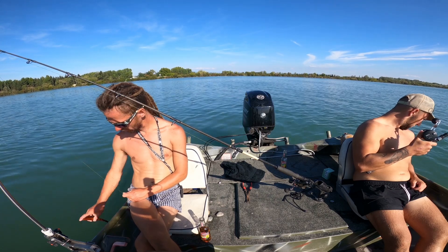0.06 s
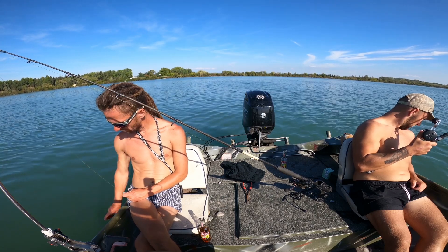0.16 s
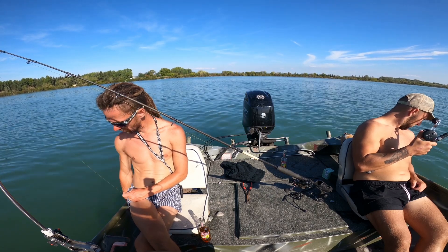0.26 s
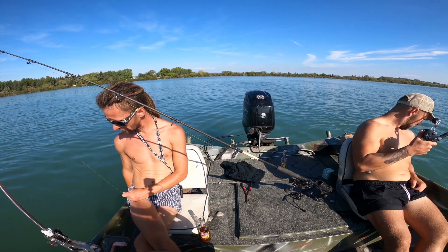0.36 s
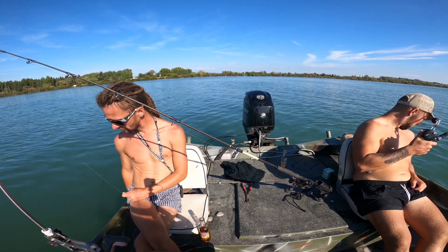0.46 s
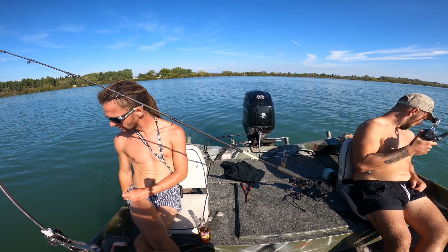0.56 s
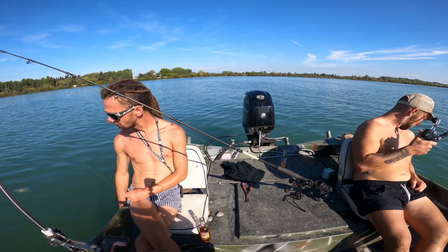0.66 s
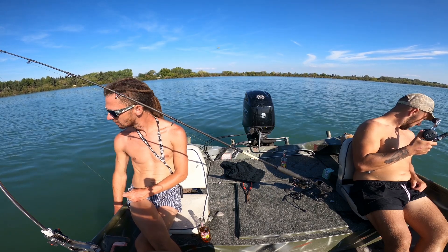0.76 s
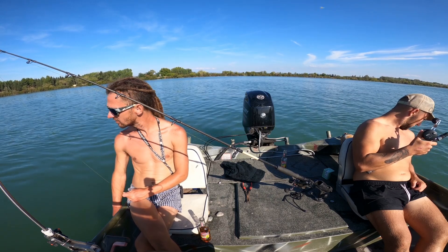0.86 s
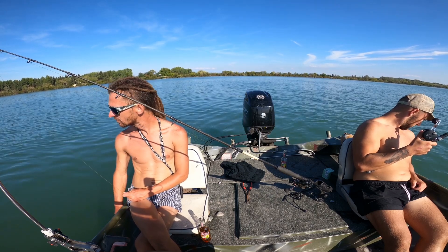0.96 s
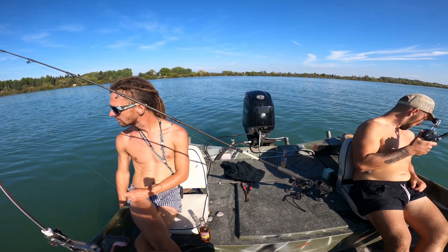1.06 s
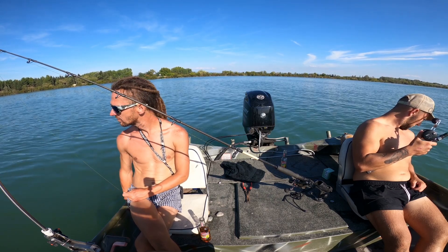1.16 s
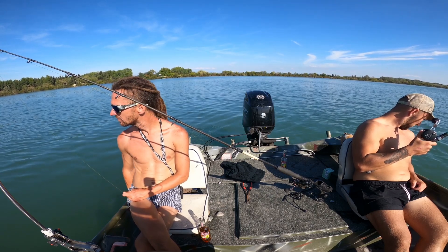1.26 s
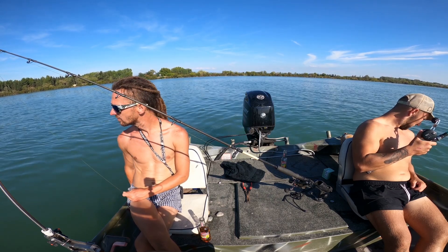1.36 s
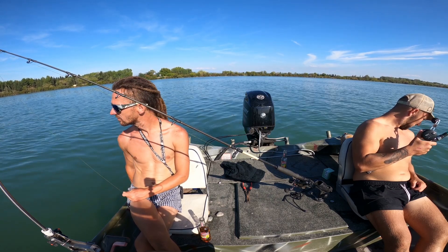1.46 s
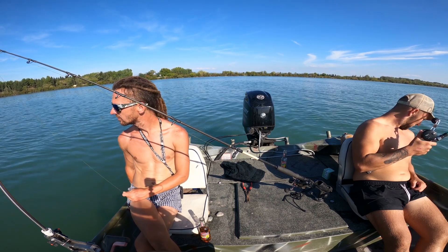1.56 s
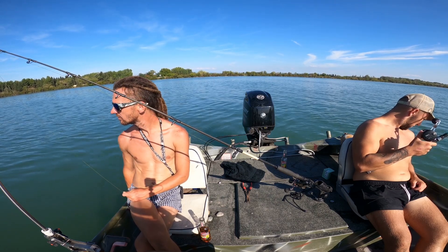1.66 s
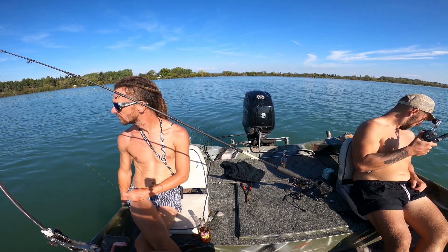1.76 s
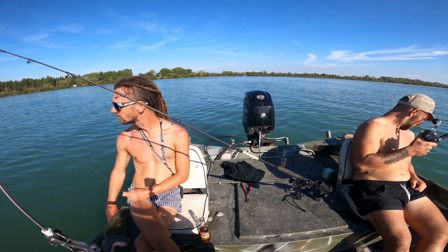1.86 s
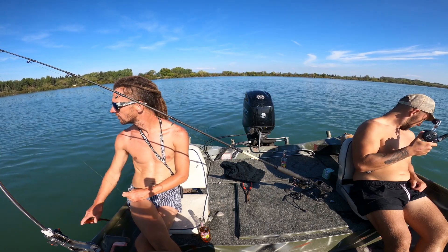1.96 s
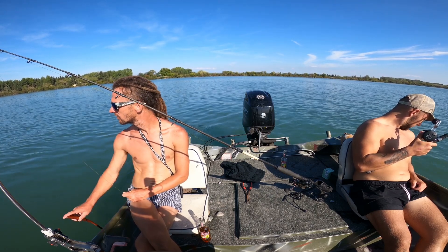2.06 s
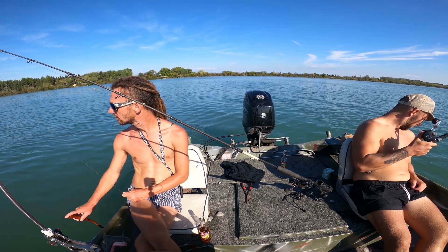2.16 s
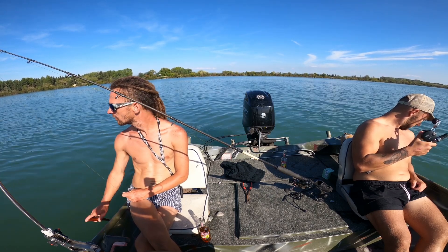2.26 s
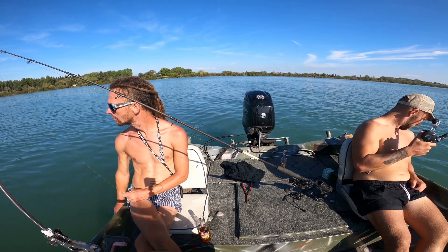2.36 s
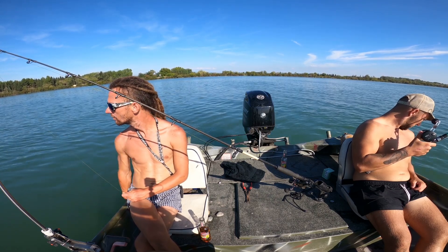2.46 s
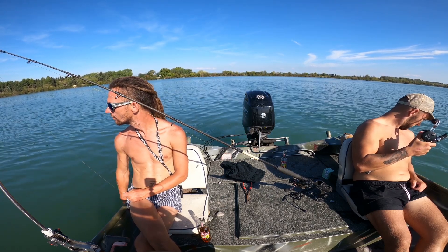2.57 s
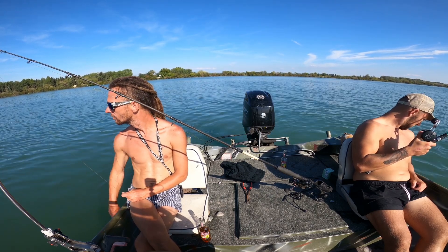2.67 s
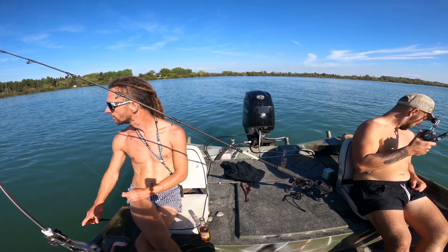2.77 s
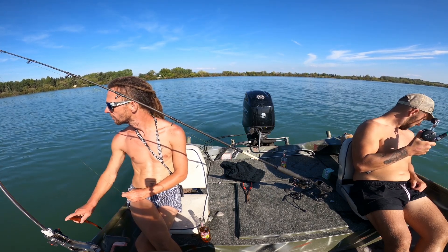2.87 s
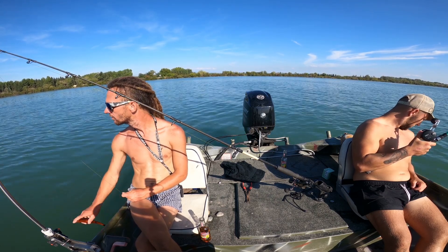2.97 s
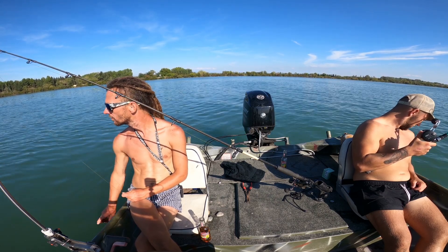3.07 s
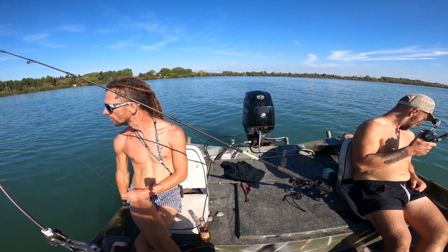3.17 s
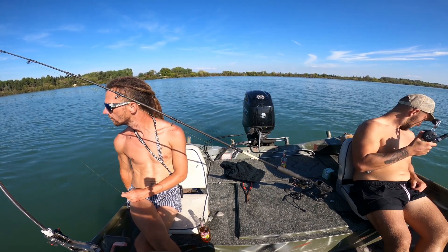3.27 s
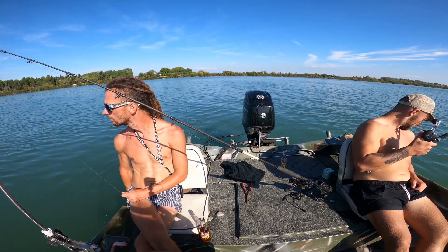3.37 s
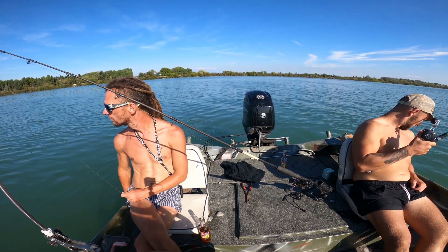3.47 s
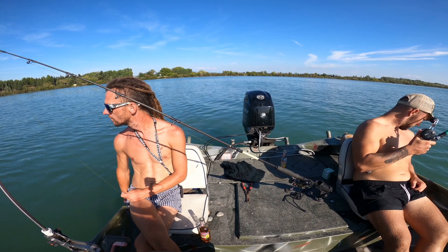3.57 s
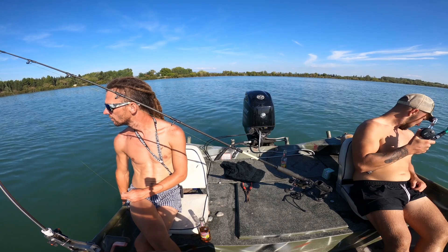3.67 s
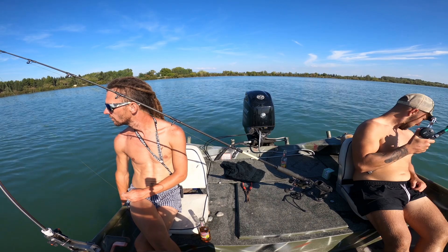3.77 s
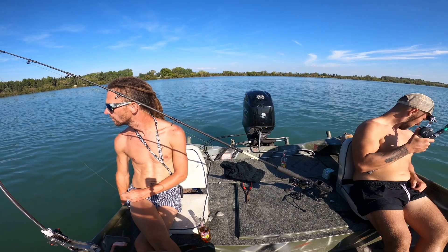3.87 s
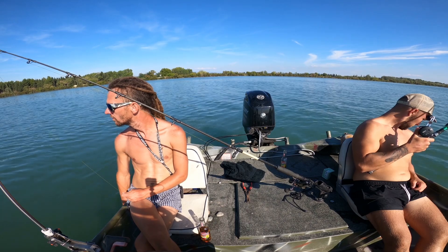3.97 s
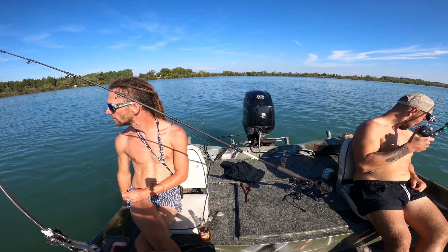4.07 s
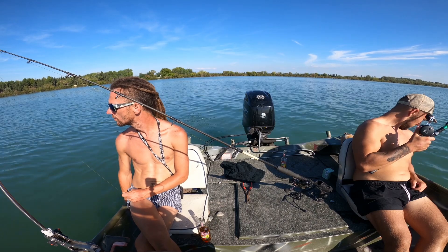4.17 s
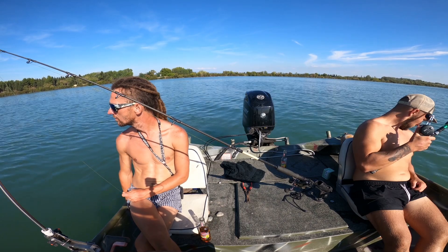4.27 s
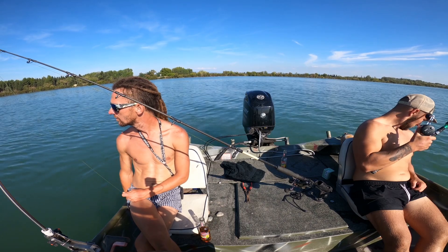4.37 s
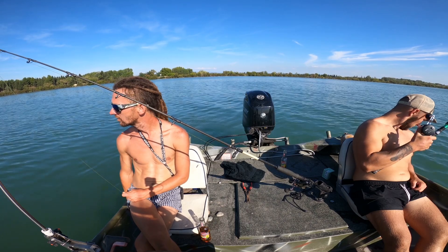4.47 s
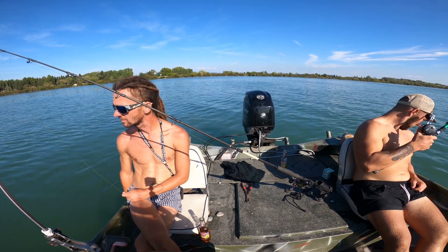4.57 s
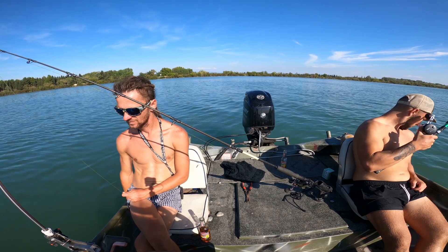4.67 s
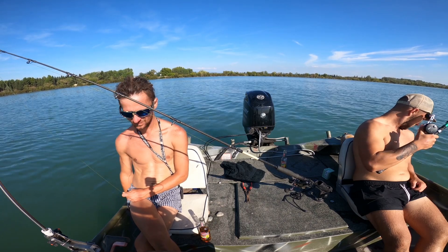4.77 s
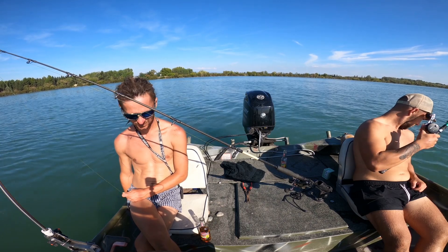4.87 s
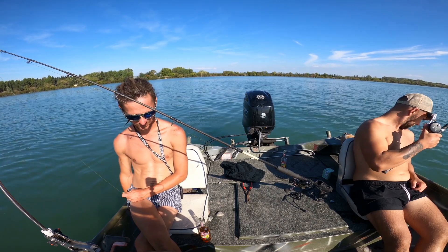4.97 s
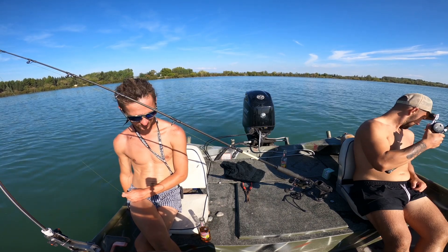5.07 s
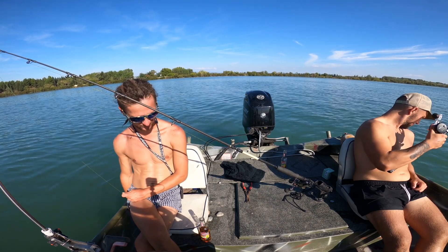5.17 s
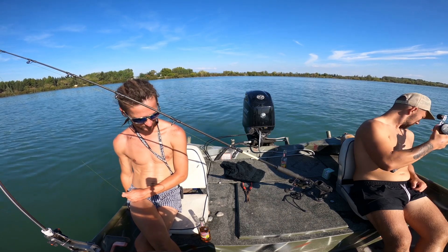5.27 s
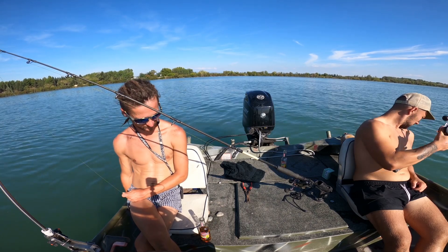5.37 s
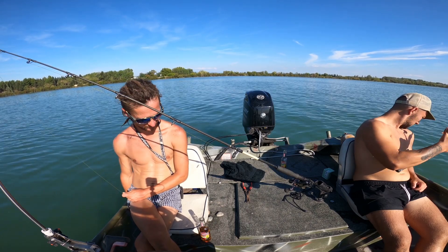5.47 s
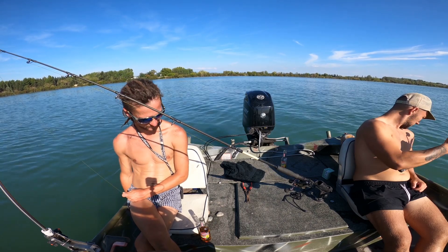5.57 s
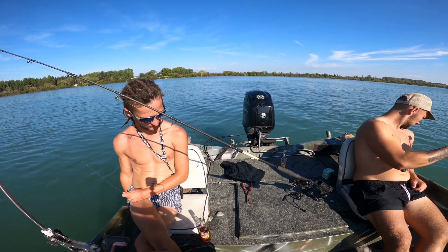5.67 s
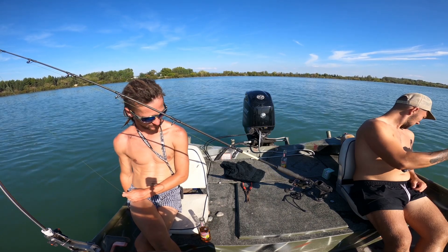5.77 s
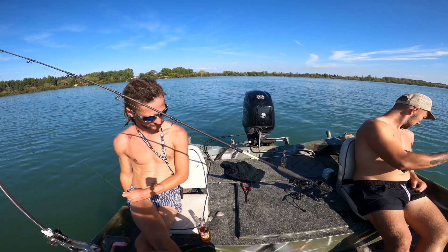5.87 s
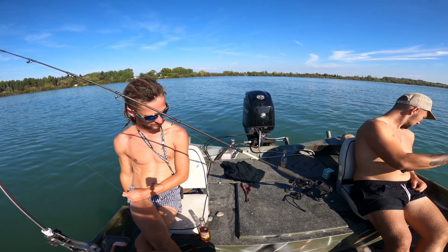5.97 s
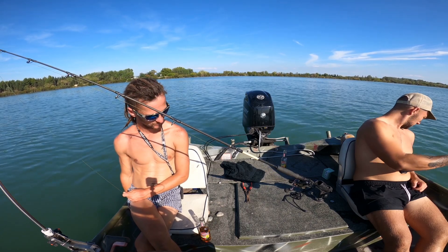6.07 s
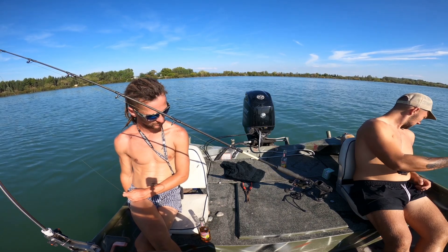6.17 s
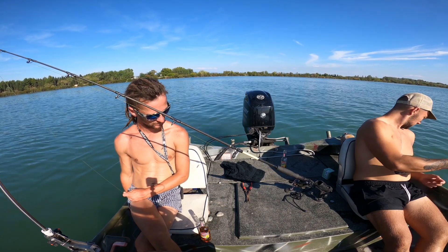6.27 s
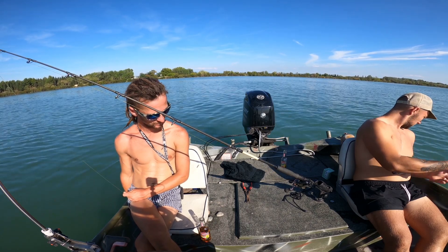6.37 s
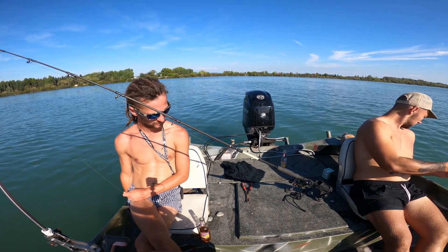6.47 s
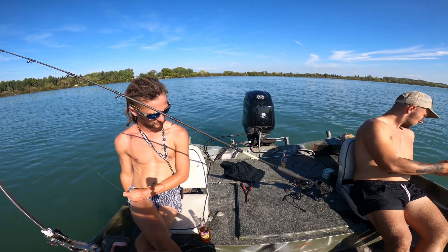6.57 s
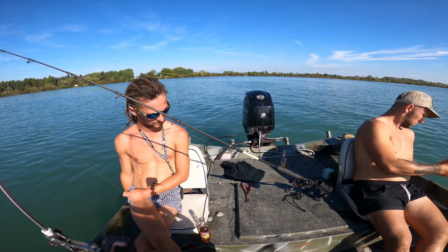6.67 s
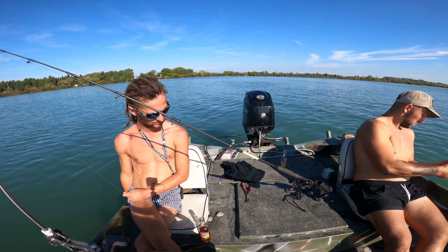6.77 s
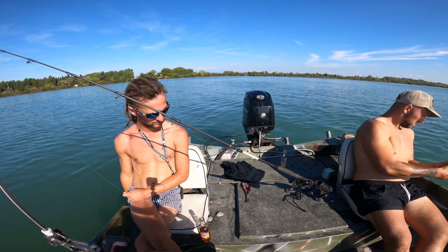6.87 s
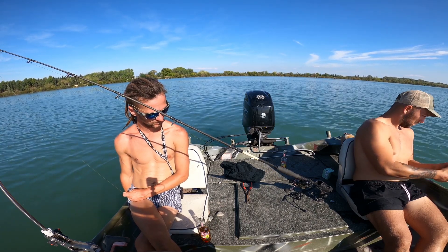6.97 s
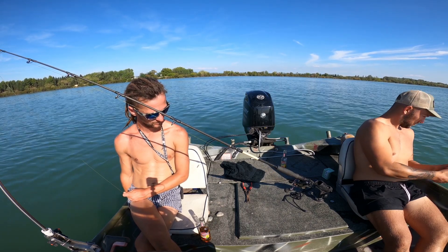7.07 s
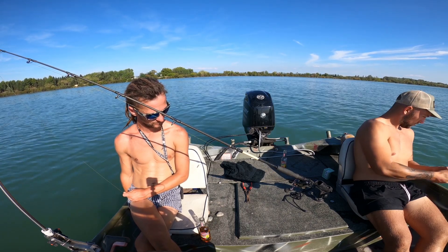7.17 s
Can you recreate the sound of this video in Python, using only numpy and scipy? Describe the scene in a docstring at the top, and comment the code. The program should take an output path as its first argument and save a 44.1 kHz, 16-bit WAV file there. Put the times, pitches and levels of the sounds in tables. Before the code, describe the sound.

Close stereo pickup outdoors, no room echo. A low, almost pure hum and faint wind run throughout. Early on comes a crisp water slap with a hollow, quickly rising plop, then fizzing droplets. About two seconds later two similar strokes land, slightly left, under a second apart. Afterwards there is only hum, wind and scattered dry knocks on the boat.

```python
"""A wooden fishing call is swung into a calm river three times from a small boat. Each stroke slaps the surface
(shaped noise) and opens an air cavity, a tone that jumps at pinch-off and glides up as the pocket shrinks.
Spray falls back as dense tiny bubbles over fizz; some bubbles ring alone as rising, decaying sines.
A low machine hum wavers in the hull, light wind rumbles as filtered noise, and tackle knocks on deck in
short resonant bursts."""
import sys
import numpy as np
from scipy import signal
from scipy.fft import rfft, irfft, next_fast_len
from scipy.io import wavfile
from scipy.ndimage import uniform_filter1d, map_coordinates

SR = 44100
rng = np.random.default_rng(int(sys.argv[2]) if len(sys.argv) > 2 else 0)


def digitize_waveform(pressure):
    """Quantize a signal to 16-bit integers and store it at the path in sys.argv[1].

    Rows of a 2-D input are taken as channels; values are limited to [-1, 1].
    """
    field = np.atleast_2d(pressure).T
    bounded = np.clip(field, -1, 1)
    quanta = np.round(bounded * 32767).astype(np.int16)
    wavfile.write(sys.argv[1], SR, quanta)


N = 317961

# strokes: pinch_off_s, slap_lead_s, slap_db, smack_over_slap_db, slap_tone_hz, tone_lift_db, plop_db,
# open_hz, jump_hz, climb_hz_per_s, climb_time_s, t60_s, life_s
STROKES = [(.3425, .0085, -18.5, -2, 2200, 10, .8, 112, 83, 10000, .036, .093, .066),
           (2.5185, .0085, -19.5, -6, 3400, 2.5, .1, 110, 49, 4220, .9, .106, .046),
           (3.2678, .006, -16.5, -11, 5600, 1.5, -1, 105, 30, 6220, .072, .104, .052)]


def amp(db):
    """Gain of a dB value."""
    return 10 ** (np.asarray(db) / 20)


def unit(x):
    """Scaled to rms 1."""
    return x / np.sqrt(np.mean(x ** 2) + 1e-20)


def along(points, hz):
    """(hz, value) points interpolated on a log frequency axis."""
    f, v = np.transpose(points)
    return np.interp(np.log(hz + 1), np.log(f + 1), v)


def curve(rows):
    """One value per sample from (time_s, value) rows."""
    return np.interp(np.arange(N) / SR, *np.transpose(rows))


def wobble(rate_hz):
    """A smooth random curve, rate_hz knots a second."""
    knots = rng.standard_normal(int(N * rate_hz / SR) + 4)
    return map_coordinates(knots, [np.arange(N) * rate_hz / SR])


def filtered(x, response):
    """x times a complex response of frequency."""
    m = next_fast_len(x.shape[-1] + 8192)
    spectrum = rfft(x, m) * response(np.fft.rfftfreq(m, 1 / SR))
    return irfft(spectrum, m)[..., :x.shape[-1]]


def ringing(f, hz, width_hz):
    """Response of one causal resonance."""
    return 1j * f * width_hz / (hz * hz - f * f + 1j * f * width_hz)


def add(track, start_s, sound):
    """Mixes a sound in at a time."""
    part = track[..., round(start_s * SR):][..., :sound.shape[-1]]
    part += sound[..., :part.shape[-1]]


def near(size):
    """Stereo white noise, nearly alike left and right in the bass, less so in the treble."""
    # hz, differing_share
    apart = [(500, 0.06), (3000, 0.2), (7000, 0.36), (15000, .6)]
    differing = filtered(rng.standard_normal((2, size)), lambda f: along(apart, f))
    return rng.standard_normal(size) + differing


def rush(spectrum, patchy_db):
    """Stereo noise of rms 1 with patches of random gain in time and frequency."""
    # hz, left_right_likeness
    alike = [(22, 0.47), (60, 0.93), (150, 0.99), (380, 0.8), (950, 0.73), (2400, 0.15), (6000, .22)]
    z = signal.stft(rng.standard_normal((2, N)), nperseg=512)[2]
    field = uniform_filter1d(rng.standard_normal(z.shape[1:]), size=8, axis=0)
    field = uniform_filter1d(field, size=16, axis=1)
    pair = signal.istft(z * amp(patchy_db * unit(field)), nperseg=512)[1][:, :N]

    def mid_side(f):
        turn = np.arccos(np.clip(along(alike, f), -1, 1)) / 2
        return amp(along(spectrum, f)) * [np.cos(turn), np.sin(turn)]

    mid, side = filtered(pair, mid_side)
    return unit(np.array([mid + side, mid - side]))


def wind():
    """Lumpy low-passed noise for the wind, and a faint far hiss."""
    # time_s, level_db
    wind_levels = [(0, -36.5), (.2, -49.5), (1.04, -44), (1.4, -47.5), (1.7, -49), (2.25, -45.5), (3, -51),
                   (4.07, -45.5), (4.7, -46.5), (5.4, -47.5), (5.9, -45.5), (6.14, -46), (6.4, -45.5),
                   (6.75, -47.5), (7.2, -44.5)]
    hiss_levels = [(0, -76), (.95, -75), (1.45, -78.5), (1.85, -75), (3.85, -77.5), (4.93, -73.5),
                   (5.5, -74), (6.4, -72.5), (7.2, -71)]
    # hz, density_db_per_hz
    rumble_spectrum = [(15, -2.5), (35, -1.5), (65, 1.5), (100, -5), (140, -9.5), (210, -17.5), (300, -27),
                       (450, -35), (600, -50.5), (900, -120)]
    hiss_spectrum = [(240, -40), (400, -1.5), (438, -5), (551, -12), (833, -15), (1340, -12), (1660, -16.5),
                     (5470, -27), (7770, -33), (9050, -44), (12900, -38.5), (15500, -42.5)]
    rumble = amp(curve(wind_levels) + 0.74 * wobble(7.5)) * rush(rumble_spectrum, patchy_db=2.5)
    hiss = amp(curve(hiss_levels) + .8 * wobble(3)) * rush(hiss_spectrum, patchy_db=1.45)
    return rumble + hiss


def hum():
    """A nearly pure tone that wavers in pitch and strength, with faint overtones."""
    # time_s, rms_db
    hum_levels = [(0, -52), (.17, -44.5), (.45, -47.5), (.97, -39), (1.27, -34.5), (1.58, -44), (1.67, -41),
                  (1.92, -47), (2.1, -40.5), (2.12, -66.5), (2.46, -42), (2.74, -46.5), (3.2, -37.5),
                  (3.38, -48), (3.57, -39.5), (3.83, -37.5), (3.97, -43), (4.19, -39.5), (4.25, -36.5),
                  (4.57, -37), (4.82, -47.5), (4.92, -40), (5.23, -38), (5.67, -40), (5.73, -41.5),
                  (5.95, -34), (6.29, -40), (6.5, -36.5), (7.2, -35.5)]
    # multiple, level_over_tone_db
    overtones = [(2, -31), (3, -48.5)]
    pitch_hz = 102.6 + 0.37 * wobble(5.7)
    phase = 2 * np.pi * np.cumsum(pitch_hz) / SR
    tone = np.sin(phase)
    for multiple, db in overtones:
        tone = tone + amp(db + 2.5 * wobble(24)) * np.sin(multiple * phase)
    return np.sqrt(2) * amp(curve(hum_levels) + 0.46 * wobble(26)) * tone


def knocks():
    """Knocks and ticks aboard and on the water: noise through one broad resonance over a brief crack."""
    # time_s, level_db, centre_hz, width_over_centre, t60_s, left_over_right_db
    knock_rows = [(0.06, -49, 1186, 0.26, 0.064, -6), (.191, -66.5, 8400, 0.33, .03, 2.5),
                  (0.313, -62.5, 2380, .8, .047, 0.2), (.325, -58, 3000, 0.75, .029, 15.5),
                  (.516, -44, 2600, .9, .015, 1.3), (.746, -68.5, 4140, .8, 0.15, 0.5),
                  (.914, -62.5, 759, 0.45, .057, -1), (.997, -47, 650, .7, 0.12, 0.5),
                  (1.004, -50.5, 1880, .45, 0.083, 2.5), (1.233, -65.5, 1197, .6, .052, 2),
                  (1.603, -61, 1102, 0.55, 0.029, .1), (1.772, -52, 1160, 0.52, 0.017, 1.4),
                  (1.95, -66, 3420, .24, 0.063, 4), (2.421, -62, 2400, 0.58, 0.021, 6.5),
                  (2.487, -63, 3530, 0.52, .032, 3.5), (2.498, -57, 2460, 1, .044, 6.5),
                  (2.702, -57.5, 2270, 0.67, .056, 3), (3.245, -62, 2480, 1, .06, 3),
                  (3.575, -52.5, 3640, 0.45, 0.19, 4.3), (3.734, -65.5, 6200, .14, 0.034, 7),
                  (3.843, -62, 6500, .46, 0.012, -6.5), (3.963, -57.5, 4410, .22, 0.045, 3.5),
                  (4.159, -73, 5950, 0.46, .055, 0.5), (4.69, -65.5, 1100, .4, .03, 1.3),
                  (5.9, -70, 1360, 0.25, .15, 5), (6.146, -57.5, 1060, .24, 0.056, 6),
                  (6.158, -58, 1840, 0.33, .055, 12.5), (6.168, -53, 1620, 0.19, 0.042, 9),
                  (6.32, -44.5, 1420, 0.59, 0.03, 3), (6.483, -61, 1100, .43, .039, -5),
                  (6.552, -71.5, 5700, .2, .04, 1), (6.568, -65, 2500, .67, 0.051, 9),
                  (6.584, -39, 1020, 0.43, 0.062, 7.5), (6.942, -68.5, 1420, 0.41, .19, 2),
                  (6.958, -64, 3150, 0.34, .068, 8), (7.035, -65.5, 3180, 0.33, 0.025, 8),
                  (7.051, -60, 1370, 0.22, 0.039, 4.5), (7.158, -51.5, 2390, 0.82, 0.062, 4),
                  (7.163, -46, 2600, .15, .04, 11)]
    crack_db, crack_t60_s = -24, .015
    out, t = np.zeros((2, N)), np.arange(SR // 5) / SR
    for s, db, hz, width, t60_s, pan_db in knock_rows:
        body = unit(filtered(rng.standard_normal(len(t)), lambda f: ringing(f, hz, width * hz) ** 2))
        crack = unit(filtered(rng.standard_normal(len(t)), lambda f: ringing(f, 3500, 4000)))
        crack = crack * amp(crack_db - 60 * t / crack_t60_s)
        decay = amp(-60 * t / t60_s) + amp(-15.5 - 25 * t / t60_s)  # fast, then slow
        burst = (body * decay + crack) * (1 - np.exp(-t / 0.0024))
        add(out, s - .001, amp(db + np.array([[pan_db / 2], [-pan_db / 2]])) * burst)
    return out


def bubble(hz, rise, t60_s, t):
    """A soft-starting decaying note whose pitch climbs as the bubble nears the surface."""
    phase = 2 * np.pi * hz * (t + rise * t * t / t60_s)  # up by 2 * rise over one t60
    return np.sin(phase) * amp(-60 * t / t60_s) * (1 - np.exp(-t / (.1 * t60_s)))


def bubbles():
    """Drops and bubbles that stand out alone, each a tick and a note; deep ones ring longer."""
    # time_s, level_db, start_hz, half_rise_share_per_t60
    bubble_rows = [(.41, -40.5, 2050, .05), (.441, -41, 1510, 0.057), (.478, -42, 2080, .035),
                   (.493, -46, 1215, .042), (.532, -38, 1970, .055), (.54, -41, 570, 0.54),
                   (.686, -56.5, 1340, .05), (.698, -49.5, 1354, .08), (2.074, -41, 645, .036),
                   (2.621, -36.5, 1236, .023), (2.728, -43.5, 765, 0.055), (2.745, -44.5, 398, 0.13),
                   (2.765, -46.5, 1410, 0.058), (2.779, -43, 1270, .11), (2.792, -34.5, 980, 0.48),
                   (2.861, -47, 1760, 0.17), (3.264, -18, 868, 0.27), (3.471, -38.5, 1860, 0.078),
                   (3.499, -42.5, 1460, .05), (3.515, -39.5, 2130, .042), (3.58, -51, 786, .05),
                   (3.627, -46, 1345, 0.058), (3.632, -40, 2520, .02), (3.66, -51, 2300, .05),
                   (6.955, -41, 420, 0.023)]
    tick_db, tick_t60_s = -16, 0.0021
    t60_cycles = 47
    out, t = np.zeros(N), np.arange(SR // 5) / SR
    for s, db, hz, rise in bubble_rows:
        tick = unit(filtered(rng.standard_normal(len(t)), lambda f: ringing(f, 2500, 3000)))
        tick = tick * amp(tick_db - 60 * t / tick_t60_s)
        add(out, s, amp(db) * (bubble(hz, rise, t60_cycles / hz, t) + tick))
    return out


def spray_levels():
    """Gains of spray middle, treble, bass: a dying water sheet per stroke, then showers that swell, hold, fade."""
    # start_s, hold_s, level_db, treble_over_level_db, bass_over_level_db
    showers = [(0.464, .015, -58, -9, 3), (0.524, 0.016, -57.5, 6, 2), (0.593, 0.064, -74.5, 5.5, 13),
               (2.652, 0.029, -63.5, 5.5, 5), (2.706, 0.035, -60, -1, -1), (2.77, 0.027, -58, 1.5, -.5),
               (2.86, 0.024, -64.5, -7.5, -15), (3.421, .02, -59.5, 4, -14), (3.47, 0.041, -58.5, 5.5, -19),
               (3.559, 0.063, -58.5, 6, -30), (3.698, 0.33, -95.5, 24, -1)]
    attack_s, shower_t60_s = 0.011, 0.28
    # the sheet tears fast and seethes slower; levels over the slap
    tear_db, tear_t60_s, seethe_db, seethe_t60_s = -25.5, 0.2, -33, 0.49
    treble_db, tear_bass_db, seethe_bass_db = 1.5, 4, 6.5
    t, power = np.arange(N) / SR, np.zeros((3, N))

    def swell(start_s, hold_s, t60_s):
        u = t - start_s
        fade = amp(-60 * np.clip(u - attack_s - hold_s, 0, 3) / t60_s)
        return np.clip(u / attack_s, 0, 1) ** 2 * fade

    def gains(db, high_db, low_db):
        return amp(db + np.c_[[0, high_db, low_db]])

    for s, lead_s, slap_db, *_ in STROKES:
        tear = gains(slap_db + tear_db, treble_db, tear_bass_db) * swell(s - lead_s, 0, tear_t60_s)
        seethe = gains(slap_db + seethe_db, treble_db, seethe_bass_db) * swell(s - lead_s, 0, seethe_t60_s)
        power += tear ** 2 + seethe ** 2
    for s, hold_s, db, high_db, low_db in showers:
        power += (gains(db, high_db, low_db) * swell(s - attack_s, hold_s, shower_t60_s)) ** 2
    return np.sqrt(power)


def spray(count=12000):
    """Falling spray: dense tiny bubbles of all sizes over a fizz that comes in patches."""
    # hz, density_db_per_hz
    fizz_spectrum = [(290, -34), (500, -2.5), (780, -8), (875, -11.5), (1270, -4.5), (1720, -4),
                     (3520, -10.5), (6260, -14.5), (12300, -39), (15500, -55.5)]
    middle, treble, bass = spray_levels()
    draw = rng.random((count, 5))  # time, pitch, size, decay, place
    hz = 600 * 20 ** draw[:, 1:2]
    t = np.arange(SR // 60) / SR
    size_db = np.minimum(-4 * np.log(draw[:, 2:3]), 12)
    t60_s = (8 + 40 * draw[:, 3:4]) / hz
    notes = amp(size_db) * np.sqrt(hz) * bubble(hz, .07, t60_s, t)
    at = ((draw[:, :1] * N).astype(int) + np.arange(len(t))).ravel()
    drops = []
    for side_db in (3.5, -3.5):  # each bubble has its own place between left and right
        placed = notes * amp(side_db * (draw[:, 4:] - .5))
        drops.append(np.bincount(at, placed.ravel(), N + len(t))[:N])
    fizz = amp(3.3 * wobble(90)) * near(N)
    mix = .9 * unit(np.array(drops)) + unit(fizz)
    whole = unit(filtered(mix, lambda f: amp(along(fizz_spectrum, f))))
    low = filtered(whole, lambda f: 1 / (1 + (f / 1200) ** 4))
    high = filtered(whole, lambda f: 1 / (1 + (4000 / (f + 1)) ** 4))
    return middle * (whole - high - low) + bass * low + treble * high


def afterring(plops):
    """A dull echo, likely off the river bed, and a faint rough ring in the boat's hollow spaces."""
    t = np.arange(SR // 3) / SR
    noise = rng.standard_normal(len(t)) + 0.06 * rng.standard_normal((2, len(t)))
    tail = noise * amp(-60 * t / 0.41) * (t > .03)
    tail = filtered(tail, lambda f: ringing(f, 330, 350))
    ring = signal.fftconvolve(plops[None], tail / np.linalg.norm(tail[0]), axes=1)[:, :N]
    echo = filtered(plops, lambda f: ringing(f, 240, 130) ** 2 * np.exp(-2j * np.pi * f * .053))
    return amp(-33.0) * echo + amp(-43) * ring


def hull(f):
    """Response of the hull: a low panel shaken again and again, and dips where panels likely soak up the note."""
    # delay_s, level_db
    echoes = [(.0138, -3.6), (.0255, -9), (.0397, -15)]
    # dip_hz, width_hz, depth_0_to_1
    dip_rows = [(334, 73, .7), (437, 25, .71)]
    shakes = sum(amp(db) * np.exp(-2j * np.pi * f * delay_s) for delay_s, db in echoes)
    dips = sum(depth * ringing(f, hz, width_hz) for hz, width_hz, depth in dip_rows)
    return 1 + ringing(f, 210, 24) ** 2 * shakes - dips


def slaps():
    """Each slap on the surface: a coloured noise burst with a brief smack as the flat face meets the water."""
    # hz, density_db_per_hz
    slap_spectrum = [(410, -38), (700, -7.5), (1520, -2.5), (2000, -9), (2270, 0.5), (2690, -8.5),
                     (3630, -6), (4580, -10), (6330, -13), (15500, -45.5)]
    smack_late_s, smack_width_s, smack_top_hz = .0095, 0.00078, 5970
    out, u = np.zeros((2, N)), np.arange(SR // 4) / SR
    decay = amp(-60 * u / 0.045) + amp(-26.5 - 60 * u / 0.096)
    burst = decay * (1 - np.exp(-(u / 0.0098) ** 4))
    lead_in = amp(-42) * (u / 0.017) * (u < .009)  # the blade cuts the surface just before
    smack_shape = np.exp(-((u - smack_late_s) / smack_width_s) ** 2)
    for s, lead_s, slap_db, smack_db, tone_hz, lift_db, *_ in STROKES:
        colour = lambda f: amp(along(slap_spectrum, f)) * (1 + amp(lift_db) * ringing(f, tone_hz, 640))
        noise = unit(filtered(near(len(u)), colour))
        dull = filtered(noise, lambda f: 1 / (1 + (f / smack_top_hz) ** 4))
        smack = amp(smack_db) * smack_shape * dull
        add(out, s - lead_s - .008, amp(slap_db) * ((burst + lead_in) * noise + smack))
    return out


def cavity(t, open_hz, jump_hz, climb_hz_per_s, climb_time_s, t60_s, life_s):
    """A slow push while the cavity is open; at pinch-off the note jumps, then climbs as the air pocket shrinks."""
    step = lambda at_s, width_s: 1 / (1 + np.exp(-(t - at_s) / width_s))
    shut, after = step(.0008, .00045), np.maximum(t, 0)
    fast_rise_hz = 94 * (1 - np.exp(-after / .0044))
    climb_hz = climb_hz_per_s * climb_time_s * (1 - np.exp(-after / climb_time_s))
    hz = open_hz + jump_hz * shut + fast_rise_hz + climb_hz
    cycles = np.cumsum(hz) / SR
    swell = (1 - shut) * .46 * step(-.0045, .0036) + shut * amp(-60 * t / t60_s)
    collapse = 1 - step(life_s, .002)
    return swell * collapse * np.cos(2 * np.pi * (cycles - np.interp(0, t, cycles)))


def cavity_plops():
    """The gliding note of each closing cavity, coloured by the hull."""
    out, u = np.zeros(N), np.arange(SR // 4) / SR
    before_s = .04
    for s, _, _, _, _, _, plop_db, *shape in STROKES:
        add(out, s - before_s, amp(plop_db) * cavity(u - before_s, *shape))
    return filtered(out, hull)


def scene():
    """All layers; slaps, spray and bubbles lean left as time passes, their top end pulled to the right."""
    plops = cavity_plops()
    lean_db = np.interp(np.arange(N) / SR, [1, 2.4], [0, 1])  # later strokes land further left
    water = (slaps() + spray() + bubbles()) * amp([lean_db, -lean_db])
    left_db = [(700, -0.21), (2500, 0.011), (7000, -.3), (15000, -1.5)]  # by hz; the right gets the opposite
    shade = lambda f: amp(np.outer([1, -1], along(left_db, f)))
    river = plops * amp([[.08], [-.08]]) + afterring(plops) + filtered(water, shade)
    return river + knocks() + hum() + wind()


def record(dry):
    """Nothing passes above a sharp band limit of 15.6 kHz."""
    return filtered(dry, lambda hz: hz < 15600)


dry = scene()
out = record(dry)
digitize_waveform(out)
```